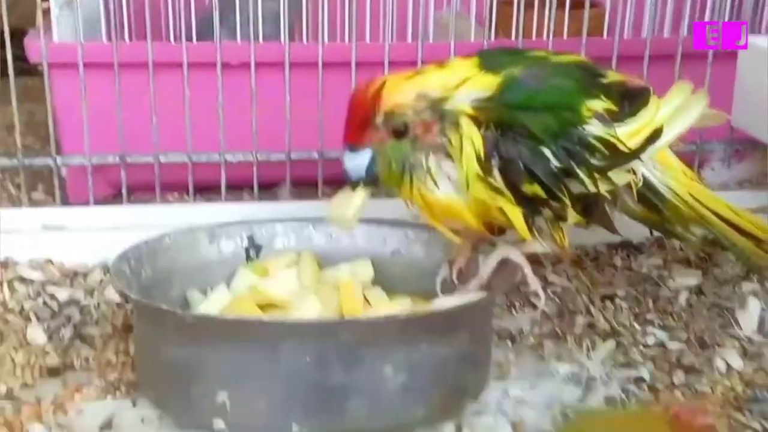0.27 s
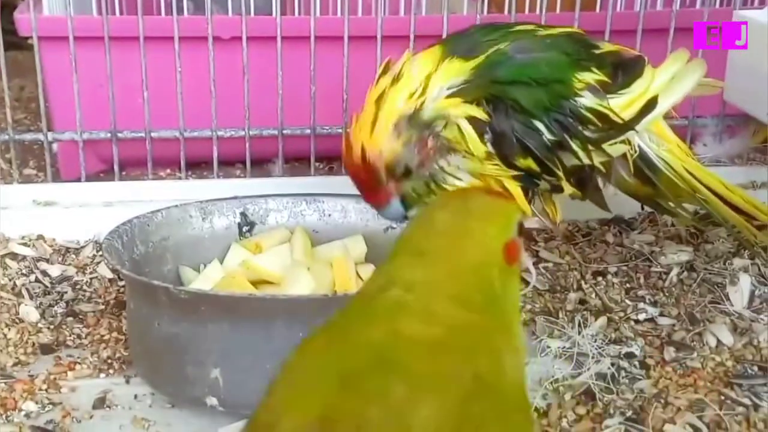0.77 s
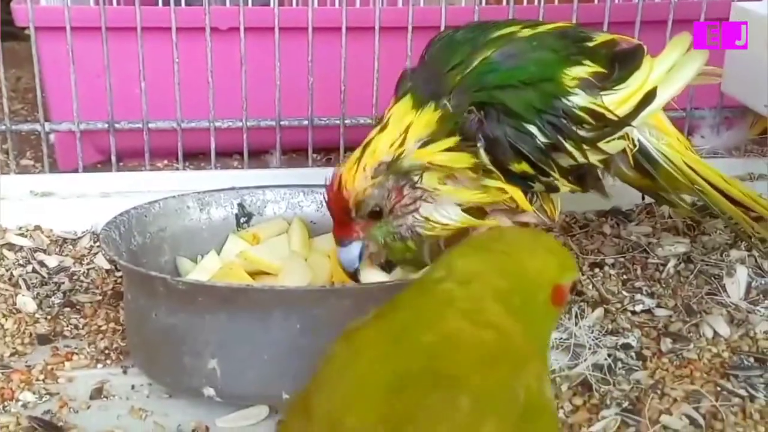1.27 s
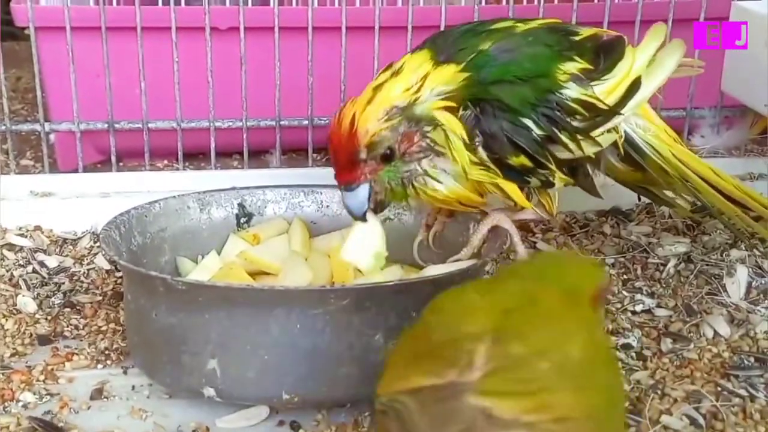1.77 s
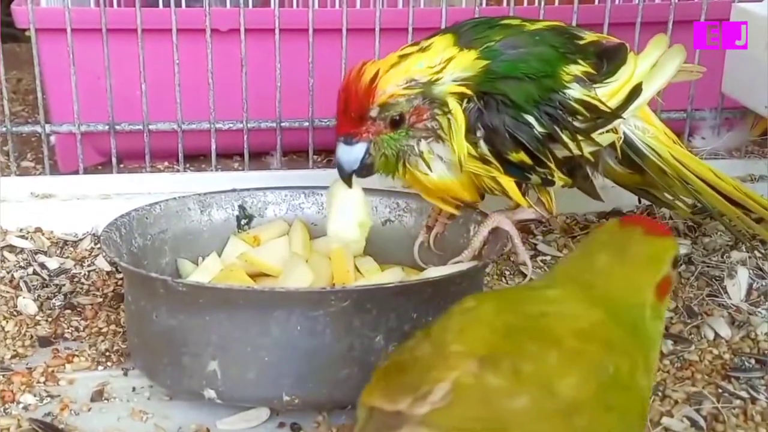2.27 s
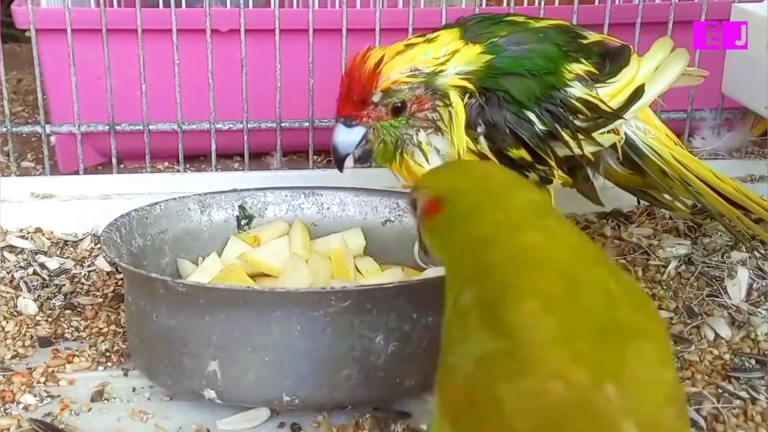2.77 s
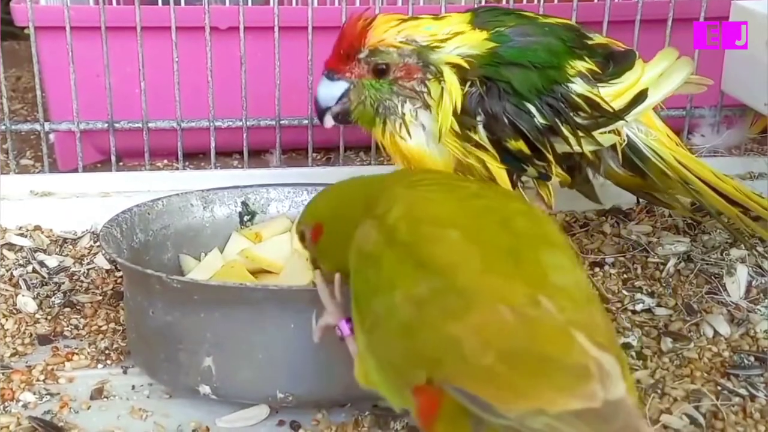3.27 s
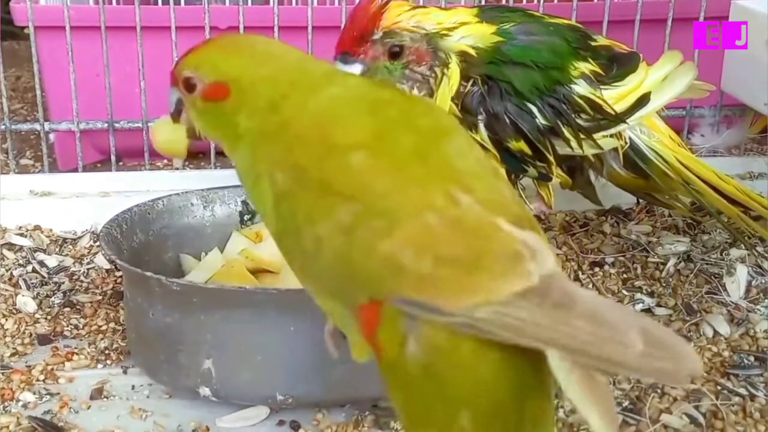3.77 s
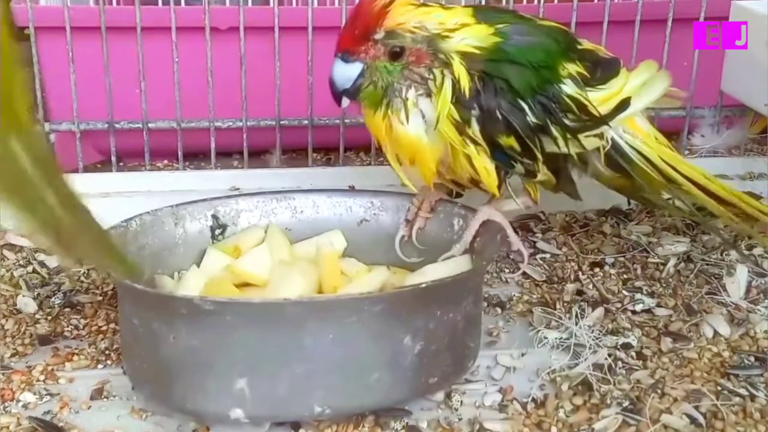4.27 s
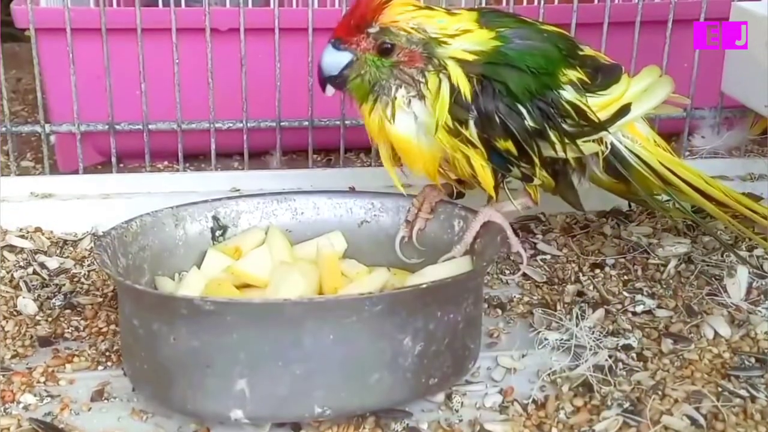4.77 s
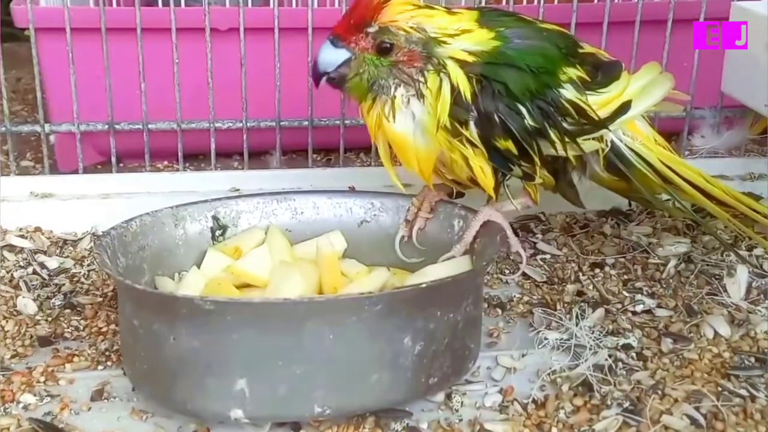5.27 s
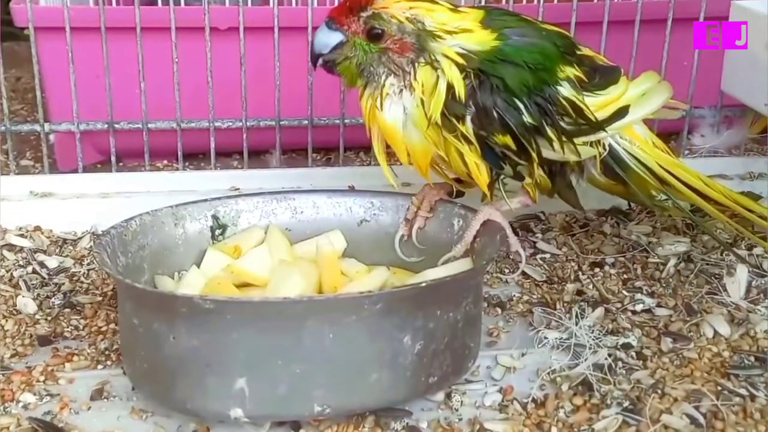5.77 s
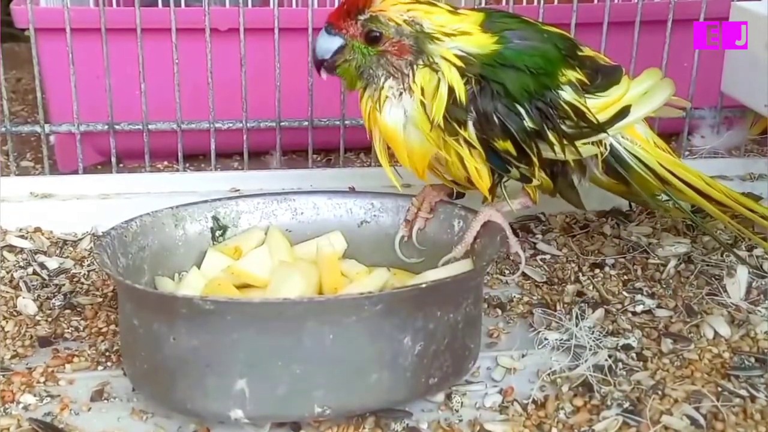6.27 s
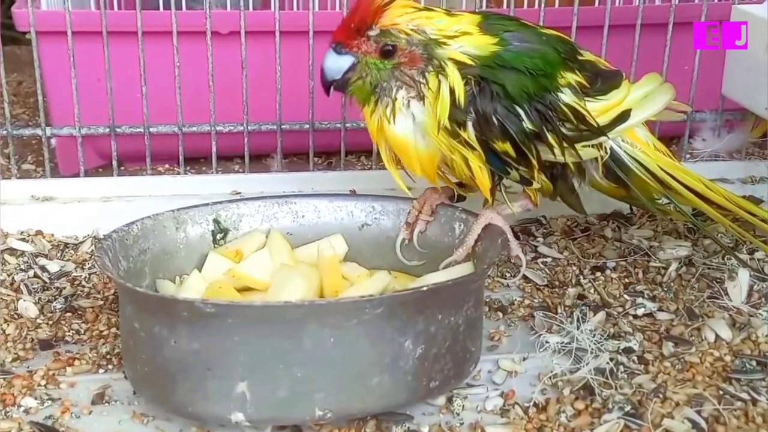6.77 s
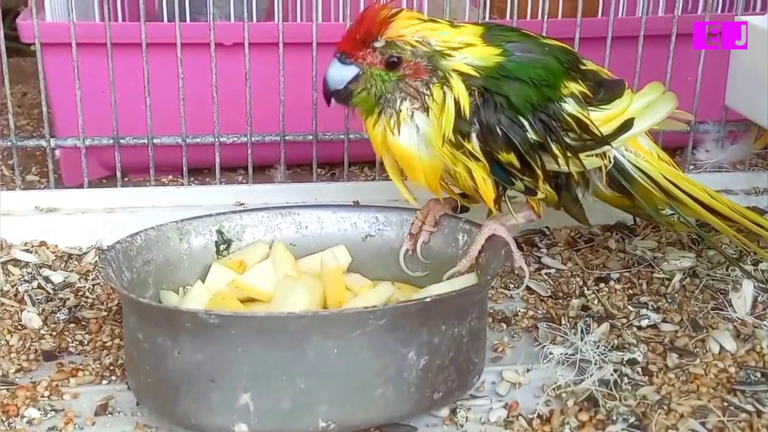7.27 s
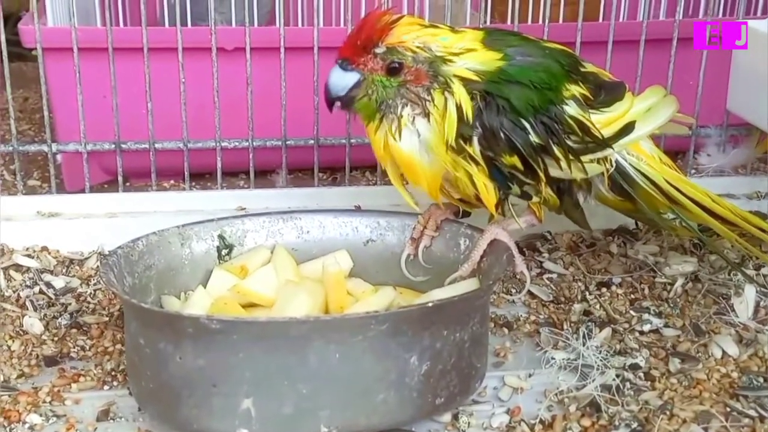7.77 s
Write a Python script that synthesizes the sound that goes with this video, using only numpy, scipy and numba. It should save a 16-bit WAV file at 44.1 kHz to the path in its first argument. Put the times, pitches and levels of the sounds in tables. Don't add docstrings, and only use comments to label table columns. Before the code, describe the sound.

Close to a phone microphone in a bare, lightly echoing room, a loud knock on a steel bowl opens over quiet hiss. Beaks crack and claws tick among dry husks, with faint chirps behind. A bird takes off with clatter, bright feather rustle and low wing thumps on the left. After a lull, a short piercing screech distorts, then distant coos and peeps follow.

```python
import sys
import numpy as np
from scipy import signal
from scipy.fft import rfft, irfft, next_fast_len
from scipy.io import wavfile
from scipy.ndimage import uniform_filter1d
from numba import njit

SR = 44100
rng = np.random.default_rng(int(sys.argv[2]) if len(sys.argv) > 2 else 0)


def natural_amplitude(level_db):
    exponent = np.asarray(level_db, float) / 20
    return 10 ** exponent


def wav_record(signal):
    frames = np.transpose(np.atleast_2d(signal))
    bounded = np.clip(frames, -1, 1)
    quanta = np.round(bounded * 32767).astype(np.int16)
    wavfile.write(sys.argv[1], SR, quanta)


N = 353196
PORT_HZ = 81.4


def peak(hz, centre_hz, width_hz):
    return 1j * hz * width_hz / (centre_hz ** 2 - hz ** 2 + 1j * hz * width_hz + 1e-9)


def shape(x, gain):
    size = next_fast_len(x.shape[-1] + 4096)
    spectrum = rfft(x, size) * gain(np.fft.rfftfreq(size, 1 / SR))
    return irfft(spectrum, size)[..., :x.shape[-1]]


def unit(x):
    return x / np.sqrt(np.mean(x ** 2))


def sides(pan_db):
    return natural_amplitude(np.array([pan_db, -pan_db]) / 2)


def add(out, start_s, x):
    i = int(start_s * SR)
    out[:, i:i + x.shape[-1]] += x[..., :N - i]


def walk(rate_hz):
    hold = int(SR / rate_hz)
    levels = np.repeat(rng.standard_normal(N // hold + 1), hold)
    return 0.14 * uniform_filter1d(levels, hold)[:N]


def cavity(f):
    # centre_hz, width_hz, gain over flat
    cavity_modes = [(6500, 1400, 1.1), (7600, 900, -.9)]
    return 1 + sum(gain * peak(f, hz, width_hz) for hz, width_hz, gain in cavity_modes)


def room_tone():
    # freq_hz, level_db per Hz
    hiss_spectrum = [(71, -30.5), (120, -13), (239, -6), (380, -7), (690, -13), (1250, -17.5),
                     (2960, -24.5), (15300, -26.5)]
    # time_s, level_db
    rumble_swell = [(0.0, -52.5), (0.33, -53.5), (0.98, -57), (2.07, -56.5), (3.23, -58.5), (4.0, -52.5),
                    (4.32, -51), (4.48, -55.5), (5.1, -54.5), (5.57, -50.5), (5.88, -60.5), (6.44, -57),
                    (6.79, -59), (7.53, -51.5), (8.0, -56)]
    hz, db = np.transpose(hiss_spectrum)
    t = np.arange(N) / SR
    rumble_db = np.interp(t, *np.transpose(rumble_swell))
    hush_db = -2.5 * np.exp(-((t - 6.35) / 1) ** 2)
    hiss_db = -54.5 + 0.54 * (rumble_db - rumble_db.mean()) + hush_db

    def spectrum(f):
        return natural_amplitude(np.interp(np.log(f + 1), np.log(hz), db))

    mid = shape(rng.standard_normal(N), spectrum)
    side = shape(rng.standard_normal(N), spectrum)
    side = shape(side, lambda f: np.clip(0.49 + f / 2000, 0, 1))
    stereo = unit(shape(np.array([mid + side, mid - side]), cavity))
    hiss = natural_amplitude(hiss_db + 0.8 * walk(40)) * stereo
    drone = rng.standard_normal((2, N)) + rng.standard_normal(N)
    drone = unit(shape(drone, lambda f: peak(f, PORT_HZ, 37) * peak(f, 81, 70)))
    return hiss + natural_amplitude(rumble_db + 5.5) * drone


@njit
def walls(x, lags, gain, damp):
    line, soft, out = np.zeros((8, 4096)), np.zeros(8), np.zeros((2, len(x)))
    for i in range(len(x)):
        total = 0.
        for k in range(8):
            soft[k] += (1 - damp) * (gain[k] * line[k, (i - lags[k]) & 4095] - soft[k])
            total += soft[k]
            out[k % 2, i] += soft[k] * (1 - (k & 2))
        for k in range(8):
            line[k, i & 4095] = x[i] + soft[k] - total / 4
    return out


def reverb(near, far):
    lags = np.array([211, 347, 523, 719, 941, 1171, 1429, 1693])
    t60_s = 0.44
    near_send = natural_amplitude(-26) * shape(near.sum(axis=0), lambda f: 1 / (1 + 1j * f / 7000) ** 2)
    far_send = natural_amplitude(-11.5) * shape(far, lambda f: 1 / np.sqrt(1 + (f / 11000) ** 8))
    return walls(near_send + far_send + 1e-18, lags, natural_amplitude(-60 * lags / SR / t60_s), 0.04)


def whistle(rows, order=2, fade_s=0.016, rasp_db=-90):
    s, *columns = np.transpose(rows)
    t = np.arange(s[0], s[-1], 1 / SR)
    hz, db, second_db, rough = (np.interp(t, s, c) for c in columns)
    shake = unit(shape(rng.standard_normal((2, len(t))), lambda f: 1 / (1 + 1j * f / 200) ** 2))
    phase = 2 * np.pi * np.cumsum(hz * (1 + 0.1 * rough * shake[0])) / SR
    air = shape(rng.standard_normal(len(t)), lambda f: peak(f, 6800, 4100) + 0.56 * peak(f, 7800, 4000))
    rasp = rough ** 2 * natural_amplitude(np.maximum(db, second_db) + rasp_db) * unit(air)
    voice = natural_amplitude(db) * np.sin(phase) + natural_amplitude(second_db) * np.sin(order * phase) + rasp
    edge = np.minimum(np.minimum(t - s[0], s[-1] - t) / fade_s, 1)
    out = np.zeros((1, N))
    add(out, s[0], np.sqrt(2) * edge * (1 + rough * shake[1]) * voice)
    return out[0]


def call(start_s, length_ms, hz, db, second_db, rough, rise, sag, attack_s, fade_db, thin_db):
    swell_db = 16
    stages = [(0, -rise, -swell_db, 0),
              (attack_s / 2, -rise / 3, -swell_db / 3, 0),
              (attack_s, 0, 0, 0),
              (length_ms / 1000, -sag, -fade_db, -thin_db)]
    return [(start_s + late_s, hz * (1 + bend), db + rel_db, db + rel_db + second_db + less_db, rough)
            for late_s, bend, rel_db, less_db in stages]


def far_birds():
    # start_s, length_ms, pitch_hz, level_db, second_partial_db
    chirp_calls = [
        (1.013, 51, 2776, -51, 6),
        (1.117, 55, 2815, -47.5, -4),
        (7.417, 50, 2887, -50.5, 6),
        (7.74, 84, 3008, -50.5, -0.5),
        (7.857, 68, 2950, -46, -1.5),
    ]
    # start_s, length_ms, pitch_hz, level_db, second_partial_db
    peep_calls = [
        (6.625, 37.2, 5080, -39.5, -35.5),
        (7.306, 35.7, 5036, -38.5, -31.5),
        (7.40, 36, 4950, -54, -30),
        (7.454, 44.7, 4960, -37.5, -33),
    ]
    # start_s, length_ms, pitch_hz, level_db, fourth_partial_db
    coo_calls = [
        (1.037, 58.4, 344.3, -71.5, 19.5),
        (5.86, 69.4, 342.6, -51, -20),
        (6.334, 82.8, 343, -51, -17),
        (6.57, 51.96, 336.5, -56, -27.5),
        (6.87, 110.3, 348, -45.5, -7),
        (7.411, 59, 438, -49.5, -28),
    ]
    chirp = dict(rough=.11, rise=.085, sag=.01, attack_s=0.0207, fade_db=8, thin_db=30)
    peep = dict(rough=.04, rise=.03, sag=.055, attack_s=0.0215, fade_db=8, thin_db=-24)
    coo = dict(rough=.31, rise=0, sag=.025, attack_s=0.012, fade_db=10, thin_db=-2)
    chirps = sum(whistle(call(*row, **chirp), fade_s=0.002) for row in chirp_calls)
    peeps = sum(whistle(call(*row, **peep), order=1.25, fade_s=0.0054) for row in peep_calls)
    coos = sum(whistle(call(*row, **coo), order=4, fade_s=0.0016) for row in coo_calls)
    straight = natural_amplitude(11) * (natural_amplitude(11) - 1) * peeps + natural_amplitude(6) * (natural_amplitude(5) - 1) * chirps
    return natural_amplitude(8) * (chirps + peeps + coos), straight


def puffs():
    # centre_s, level_db, left_minus_right_db, push_ms
    wing_puffs = [(0.205, -21.5, 4, 8.7), (0.229, -12, 5.5, 8.1), (4.178, -9, 19, 13.4),
                  (4.193, -6.5, 16, 12.3), (4.233, -14.5, 26, 3.5), (4.247, -11, 23, 5.6),
                  (4.35, -10.5, 38, 7.5), (4.358, 0, 45, 4.9), (4.371, -2, 48, 5.9), (4.411, -30, 46, 3.1),
                  (4.425, -5.5, 47, 7.7), (4.436, -14.5, 40, 6.2)]
    port_t60_s, eddy_s = .13, 0.02
    push = np.zeros((2, N))
    for s, db, pan_db, ms in wing_puffs:
        ears = np.array([[1], [natural_amplitude(-pan_db)]])
        add(push, s - ms / 2000, natural_amplitude(db) * ears * np.hanning(int(ms * SR / 1000)))
    wake = shape(push, lambda f: 1 / (1 + 2j * np.pi * f * eddy_s / 2) ** 2)
    flutter = unit(shape(rng.standard_normal((2, N)), lambda f: peak(f, 232, 140) ** 2))
    port_width_hz = np.log(1000) / np.pi / port_t60_s
    thump = shape(push, lambda f: peak(f, PORT_HZ, port_width_hz) + 0.14 * peak(f, 200, 220))
    return natural_amplitude(-37) * 10 * wake * flutter + 5.1 * thump


def wires(count, gain, sharp):
    place, size = rng.random((2, count))
    centres_hz = 1200 * 12 ** place
    return lambda f: 1 + gain * sum(g * peak(f, hz, hz / sharp) for hz, g in zip(centres_hz, size))


def rustle(moves, treble_db, pan_db, rate, scatter_db, bed, ringing=2.2, crest=1.033, spread=1.4):
    out = np.zeros((2, N))
    for s, ms, db, hz in moves:
        u = np.arange(0, 6, 3000 / SR / ms)
        chance = rng.random((2, SR))[:, :len(u)]
        grains = (chance[0] < rate / SR) * natural_amplitude(-scatter_db * np.log(1 - chance[1]))
        grains = shape(grains, lambda f: 1 / (1 + 1j * f / 120))
        air = rng.standard_normal((2, SR))[:, :len(u)] * (unit(grains + 1e-9) + bed)
        air = shape(air, wires(count=14, gain=ringing, sharp=30))
        main = unit(shape(air, lambda f: peak(f, hz, spread * hz) ** 2))
        treble = unit(shape(air, lambda f: peak(f, 11300, 10000) ** 2))
        swell = (u * np.exp(1 - u)) ** crest
        add(out, s, natural_amplitude(db) * sides(pan_db)[:, None] * (main + natural_amplitude(treble_db) * treble) * swell)
    return out


def litter():
    # start_s, length_ms, level_db, centre_hz
    husks = [(.105, 90, -46.5, 5580), (.49, 120, -57.5, 4880), (.575, 38, -47.5, 3526),
             (.698, 18, -36.5, 4190), (.835, 50, -48, 4580), (.995, 173, -47.5, 5600),
             (1.365, 62, -39, 4500), (1.40, 127, -41, 3420), (1.595, 78, -45, 4340),
             (1.77, 30, -34.5, 3500), (1.82, 97, -50, 5650), (2.025, 62, -47.5, 3280),
             (2.085, 30, -45.5, 3120), (2.61, 93, -45, 4080), (2.73, 78, -38, 3670),
             (2.79, 130, -55.5, 2850), (2.93, 58, -50, 6600), (3.54, 33, -45.5, 3910),
             (3.565, 87, -39, 3920), (3.588, 34, -36, 4000)]
    # start_s, length_ms, level_db, centre_hz
    seeds = [(2.39, 51, -64.5, 9600), (2.905, 22, -47, 5020), (3.758, 31, -41, 5560),
             (3.78, 200, -45, 6630), (3.855, 19, -33, 5960), (3.925, 100, -41.5, 3074),
             (4.015, 30, -29.5, 6590), (4.06, 90, -43.5, 6060), (4.36, 64, -51.5, 6436),
             (4.52, 110, -52.5, 6000), (4.62, 270, -59, 6054), (4.89, 70.8, -51.5, 2190),
             (5.03, 27, -44.5, 10280), (7.15, 35, -52.5, 1575)]
    # start_s,
    # length_ms, level_db, centre_hz
    low_stirs = [(.198, 63, -22, 510), (.2, 33, -26, 2090), (.40, 18, -51.5, 556), (.52, 100, -55.5, 1206),
                 (.65, 66, -53, 902), (1.585, 27, -49.5, 473), (1.94, 194, -59.5, 650), (2.46, 45, -57, 1290),
                 (2.995, 96, -43, 564), (4.0, 32, -29.5, 741), (4.15, 120, -44.5, 515), (5.22, 290, -48, 524),
                 (6.30, 97, -60.5, 582), (6.88, 100, -49, 925), (7.39, 200, -54, 740), (7.965, 43, -54.5, 1305)]
    grainy = dict(rate=650, scatter_db=2.8, bed=.6)
    feet = rustle(husks, treble_db=-7.5, pan_db=1.5, **grainy)
    feet = feet + rustle(seeds, treble_db=0, pan_db=2, **grainy)
    return feet + rustle(low_stirs, treble_db=-17.5, pan_db=0, **grainy)


def wings():
    # start_s, length_ms, level_db, centre_hz
    feathers = [(3.642, 20, -23, 5090), (3.652, 30, -35, 4900), (3.657, 48, -27, 4963),
                (3.682, 30, -34, 4490), (3.70, 40, -40, 4260), (3.96, 36, -31, 5730),
                (4.138, 24, -35, 5645), (4.152, 54, -30.5, 5426), (4.179, 26, -26, 5230),
                (4.195, 60, -38.5, 4990), (4.232, 50, -35, 5880), (4.249, 40, -31.5, 6654),
                (4.27, 98, -46, 5850), (3.72, 70, -50, 4910)]
    # start_s, length_ms, level_db, centre_hz
    flutters = [
        (.2, 59, -22, 2966),
        (5.2, 330, -40, 4460),
        (6.30, 130, -53, 6290),
        (6.75, 130, -52.5, 5134),
        (6.885, 100, -41, 6246),
        (7.39, 150, -40, 6100),
    ]
    # centre_hz, width_hz, gain over flat
    cage_modes = [(1540, 97, 2), (2170, 260, 2), (3060, 1700, -0.42), (4960, 250, 0), (8000, 380, 2.5)]
    soft = dict(rate=900, scatter_db=3.0, bed=1.6)
    beats = rustle(feathers, treble_db=4.5, pan_db=2.5, crest=1.7, spread=0.64, **soft)
    beats = shape(beats, lambda f: 1 + sum(g * peak(f, hz, width_hz) for hz, width_hz, g in cage_modes))
    return beats + rustle(flutters, treble_db=-3, pan_db=0.6, ringing=.6, **soft)


def rings(blows, modes):
    out, t = np.zeros((2, N)), np.arange(SR // 2) / SR
    hz, mode_db, t60_s = np.transpose(modes)[:, :, None]
    for s, db, tilt_db in blows:
        chance = rng.standard_normal((3, 2, len(modes), 1))
        gain_db = mode_db + tilt_db * np.log2(hz / hz[0]) + 1.5 * chance[1] - 60 * t / t60_s
        detuned_hz = hz * (1 + 0.0041 * chance[2, 0])
        phase = 2 * np.pi * detuned_hz * t + .5 * chance[0] + 10 * chance[2, 1]
        waves = np.sin(phase) * natural_amplitude(gain_db)
        add(out, s, natural_amplitude(db) * waves.sum(axis=1) * np.minimum(t / 0.00057, 1))
    return out


def steel():
    # start_s, level_db, hardness_db per octave
    bowl_blows = [(.199, -18, -1.5), (.213, -18, -1), (2.933, -45.5, 1), (3.03, -46, -8), (3.052, -41, -4),
                  (3.645, -37.5, 8), (3.858, -37, 4), (3.875, -31.5, -1.5), (3.972, -34.5, -22),
                  (3.984, -29.5, -19), (3.998, -35, -1), (4.018, -28, -4)]
    # start_s, level_db, hardness_db per octave
    bar_plucks = [
        (.002, -53, 1),
        (.135, -61, 4),
        (.2, -35, -12),
        (.29, -48, -14),
        (4.632, -64, 5),
        (4.69, -68, 5),
        (4.762, -70, 8),
        (6.265, -55, 5),
        (6.275, -55, -8),
    ]
    # start_s, level_db, hardness_db per octave
    rim_pings = [
        (2.932, -30, 8),
        (3.645, -34, 0),
        (3.83, -45, 0),
        (3.845, -42, 0),
        (4.021, -32.5, 0),
        (4.03, -43, 0),
    ]
    # freq_hz, level_db, t60_s
    bowl_modes = [(1510, 0, .085), (1570, -5, .08), (2290, -7, .08), (4250, -8, .07), (5760, -10, .08),
                  (6800, -10, .07), (9990, -14, .05), (12600, -16, .04)]
    # freq_hz, level_db, t60_s
    bar_modes = [(2290, 0, .3), (2325, -8, .2), (5770, 0, .22), (10000, -5, .2), (14700, -9, .14)]
    # freq_hz, level_db, t60_s
    rim_modes = [(6756, 0, .075), (6900, -6, .05), (8710, -12, .035), (5023, -22, .1)]
    return rings(bowl_blows, bowl_modes) + rings(bar_plucks, bar_modes) + rings(rim_pings, rim_modes)


def ticks(hits, treble_db, scrape_ms, body, width):
    out, t = np.zeros((2, N)), np.arange(2048) / SR
    for s, db, hz, pan_db in hits:
        noise = rng.standard_normal((2, len(t))) + 0.6 * rng.standard_normal(len(t))
        scrape = shape(noise * np.exp(-t * 1000 / scrape_ms), wires(count=10, gain=1.5, sharp=14))
        crack = shape(scrape, lambda f: peak(f, hz, width * hz) + body * peak(f, 2700, 4200) ** 2)
        edge = shape(scrape, lambda f: peak(f, 9800, 8400) ** 2)
        both = crack / np.abs(crack).max() + natural_amplitude(treble_db + 15.5) * edge / np.abs(edge).max()
        add(out, s, natural_amplitude(db) * sides(pan_db)[:, None] * both)
    return out


def beaks_and_claws():
    # start_s, peak_db, contact_hz, left_minus_right_db
    claws = [(0.1035, -7, 5840, 19.5), (1.30, -45.5, 4400, -3), (1.3338, -37.5, 2200, -3.5),
             (2.6223, -36, 5550, 1), (2.6393, -30.5, 5840, 8), (2.9161, -24.5, 5770, 5),
             (3.1727, -41, 2270, 9), (3.6432, -7, 9100, 0.5), (3.858, -20.5, 9160, 2.5),
             (3.8601, -31, 1540, 9.5), (4.0024, -27.5, 1555, 3), (4.018, -9.5, 6614, 6.5),
             (4.5188, -23.5, 6690, 6.5), (6.397, -39.5, 9520, -2), (6.436, -42.5, 9700, 1),
             (6.762, -38, 10300, -1), (7.1857, -37, 9580, 6), (7.412, -23.5, 6580, 0.5)]
    # start_s, peak_db, contact_hz, left_minus_right_db
    beaks = [(0.198, 6.5, 2250, 2), (0.1985, 3, 5160, 3), (0.2021, 10, 1600, 0), (0.2008, 1, 900, 0),
             (0.609, -40, 1500, 0.5), (0.2128, 1.5, 1686, 3), (0.5282, -43, 6330, -7.5),
             (0.5826, -40.5, 6100, 0), (0.7042, -22.5, 5520, 1.5), (0.709, -31.5, 6200, 4),
             (0.818, -11.5, 4923, -3), (0.8304, -12.5, 3870, 3.5), (1.395, -2.5, 5260, 0.5),
             (1.4536, -28.5, 2800, 4.5), (1.496, -34.5, 5140, 7), (1.5114, -33, 6200, 11.5),
             (1.5845, -17, 5490, 5.5), (1.5875, -8.5, 5564, 2.5), (1.5974, -29, 2290, 1.5),
             (2.0382, -33, 5010, 2), (2.0946, -32, 2450, -6), (2.1045, -41, 4500, -2.5),
             (2.4712, -47, 1450, 1), (2.6957, -42.5, 6090, 7), (2.7391, -30, 3680, 7.5),
             (2.7481, -26.5, 3670, 5.5), (2.787, -30.5, 3000, -0.5), (2.6594, -39.5, 4200, 13),
             (2.7761, -20.5, 2210, 5.5), (2.8265, -25, 5195, 6), (2.9318, -30, 1487, 4),
             (2.9796, -37, 6700, -4), (3.054, -34.5, 1530, -10), (3.2395, -36.5, 6320, 3.5),
             (3.262, -36, 2340, 1.5), (3.551, -37.5, 5470, -1.5), (3.571, -31.5, 4000, -0.5),
             (3.578, -28.5, 5000, -0.5), (3.589, -23, 5620, 4), (3.596, -22.5, 2520, 4),
             (3.603, -27, 5460, 4), (3.84, -35, 800, -0.5), (3.938, -34, 1000, 1),
             (4.005, -28.5, 900, -3.5), (4.011, -27, 2500, 1.5), (4.025, -28.5, 800, -2),
             (3.7772, -7, 5700, 4.5), (4.0294, -22.5, 6900, 5), (4.9069, -40.5, 2575, 3),
             (6.5074, -49.5, 5500, -7)]
    # start_s, peak_db, contact_hz, left_minus_right_db
    rim_scrapes = [(1.367, -27.5, 9150, 5), (1.776, -28.5, 3580, -0.5), (1.781, -24, 5040, 0),
                   (1.788, -29, 4240, 2.5), (2.9317, -29, 6700, 10.5), (3.6426, -12, 13400, 0.5),
                   (3.6685, -14, 13400, 5), (3.7598, -26, 12600, 3), (3.571, -32.5, 4670, 3),
                   (3.589, -27, 5460, 5), (3.712, -31, 9040, 3), (3.8581, -19.5, 12500, 2),
                   (3.9679, -25, 8300, 4), (4.020, -24.5, 11640, 3.5), (4.0936, -24.5, 10000, 11),
                   (4.143, -24.5, 5800, 8), (4.1679, -18, 11800, 8), (4.1854, -18.5, 12200, 4),
                   (4.2467, -21, 9500, 3.5), (4.2637, -19.5, 12600, 2.5), (4.266, -26.5, 8040, 4)]
    out = ticks(claws, treble_db=-18, scrape_ms=1, body=0.03, width=.16)
    out = out + ticks(beaks, treble_db=-27.5, scrape_ms=0.99, body=0.24, width=.22)
    return out + ticks(rim_scrapes, treble_db=-27, scrape_ms=2.2, body=0.051, width=.05)


def screech():
    # time_s, pitch_hz, level_db
    partials = [
        [(5.461, 3874, -8), (5.472, 3866, 3), (5.487, 3877, 9), (5.512, 3626, 14), (5.545, 3638, 7),
         (5.575, 3617, 3.5), (5.60, 3637, -10)],
        [(5.545, 2774, -3.5), (5.575, 2734, 1.5), (5.61, 2667, -0.5), (5.63, 2513, -6.5), (5.69, 2449, -6),
         (5.75, 2302, -8)],
        [(5.552, 5488, -10), (5.60, 5424, -0.5), (5.622, 5134, 3), (5.65, 4266, 6.5), (5.665, 3826, 3.5),
         (5.71, 3864, 1.5), (5.76, 3665, -8.5)],
        [(5.665, 4400, 1.5), (5.69, 4427, 2.5), (5.73, 4536, -0.5), (5.76, 4516, -16)],
        [(5.548, 4500, -9.5), (5.58, 4582, -9), (5.61, 4642, -8)],
        [(5.535, 3844, -2), (5.56, 3753, -0.5), (5.585, 3766, -6.5)],
    ]
    # time_s, roughness 0-1
    hoarseness = [
        (5.463, .0),
        (5.49, .01),
        (5.505, .04),
        (5.54, .06),
        (5.555, .14),
        (5.61, .13),
        (5.66, .13),
        (5.69, .5),
        (5.75, 1.0),
    ]
    octave_db = -22
    out = np.zeros(N)
    for partial in partials:
        rows = [(s, hz, db, db + octave_db, np.interp(s, *np.transpose(hoarseness)))
                for s, hz, db in partial]
        out += whistle(rows, fade_s=0.0066, rasp_db=-16)
    return out


def echo_catches():
    catches_s = [
        5.499,
        5.511,
        5.522,
        5.5315,
        5.549,
        5.587,
    ]
    t = np.arange(N) / SR
    return np.prod([1 - .95 * np.exp(-((t - s) / .0021) ** 2) for s in catches_s], axis=0)


def scene():
    near = beaks_and_claws() + litter() + wings() + steel()
    far, far_straight = far_birds()
    loud = screech()
    voices = far + loud
    straight = voices + far_straight + (natural_amplitude(3) - 1) * loud
    direct = natural_amplitude(-5.5) * np.array([straight, natural_amplitude(-4.5) * np.roll(straight, shift=13)])
    sound = shape(near + echo_catches() * (reverb(near, voices) + direct), cavity)
    return sound + puffs() + room_tone()


def top_cut(x):
    return signal.sosfilt(signal.butter(12, 15450, fs=SR, output="sos"), x)


def record(dry):
    overload = .97
    return top_cut(np.clip(dry, -overload, overload))


dry = scene()
out = record(dry)
wav_record(out)
```